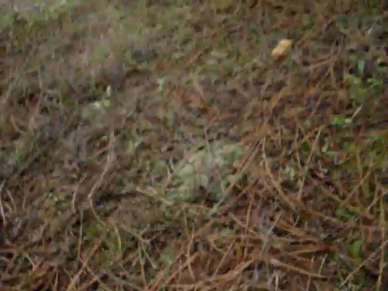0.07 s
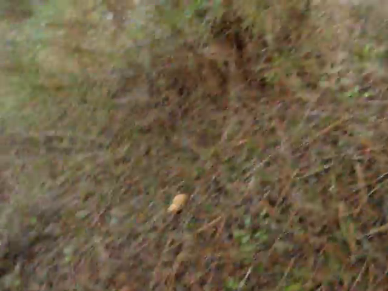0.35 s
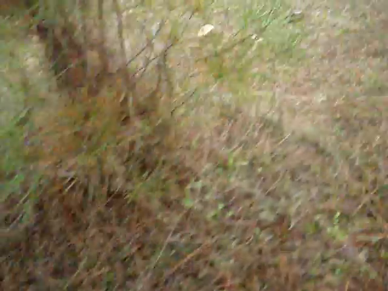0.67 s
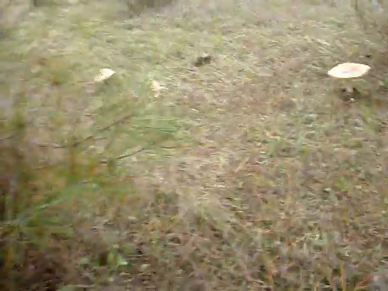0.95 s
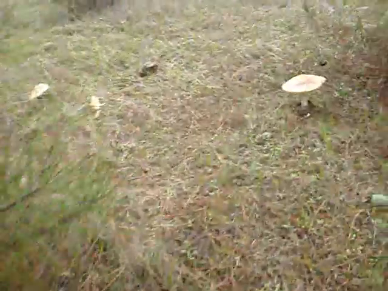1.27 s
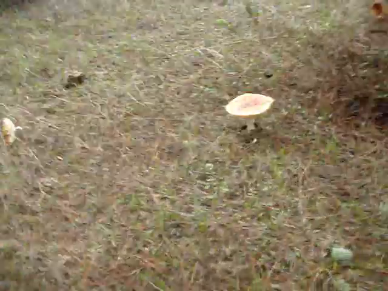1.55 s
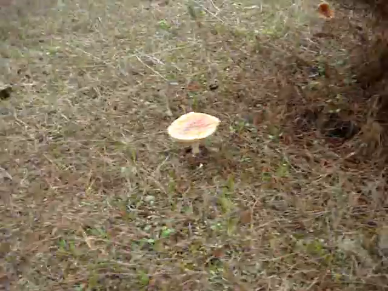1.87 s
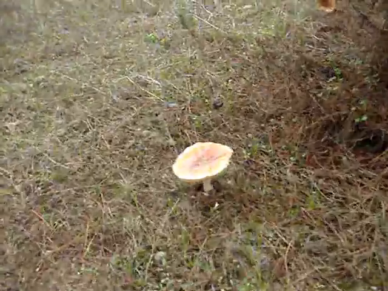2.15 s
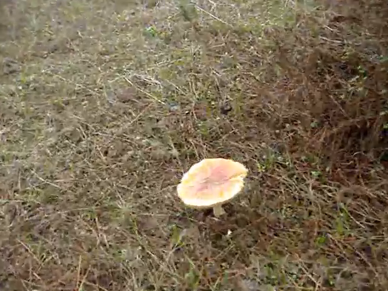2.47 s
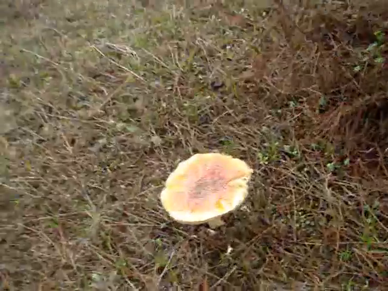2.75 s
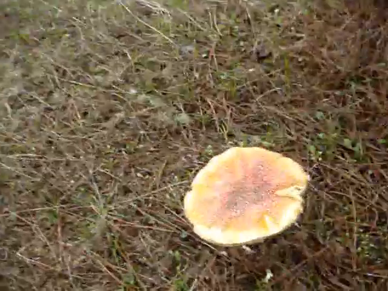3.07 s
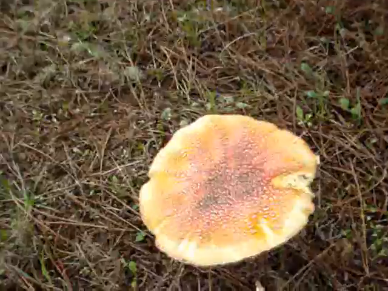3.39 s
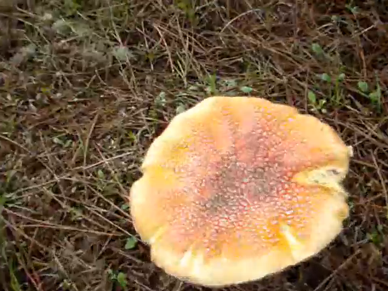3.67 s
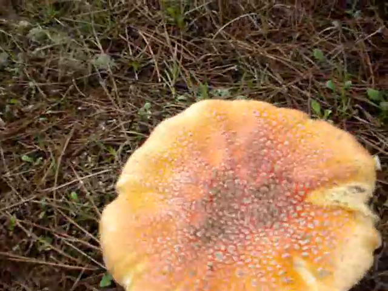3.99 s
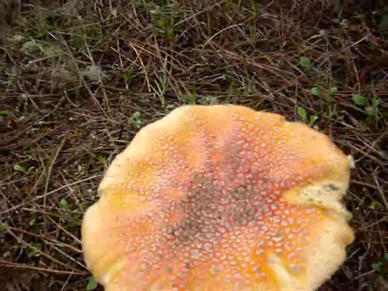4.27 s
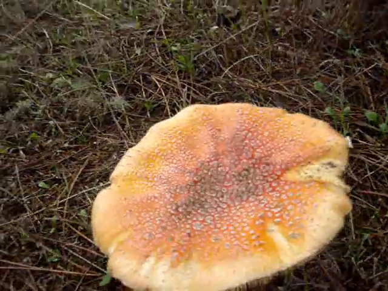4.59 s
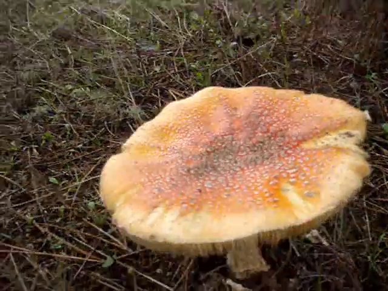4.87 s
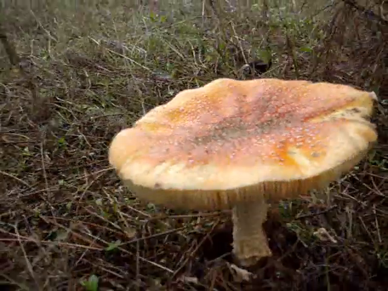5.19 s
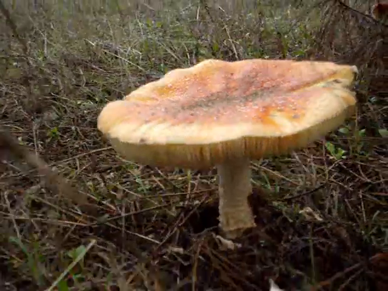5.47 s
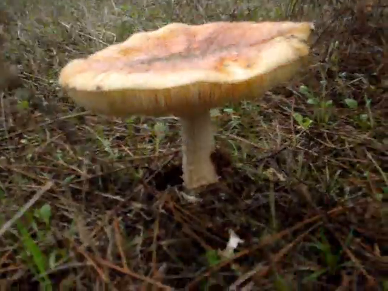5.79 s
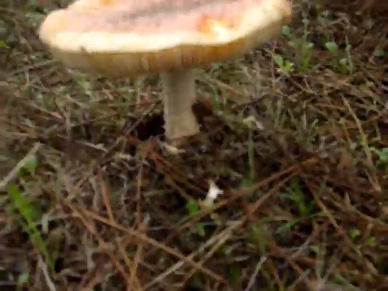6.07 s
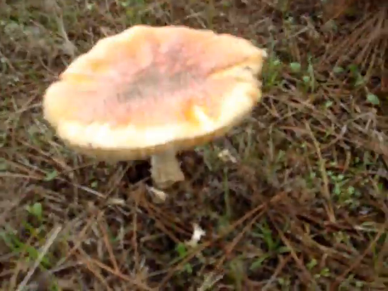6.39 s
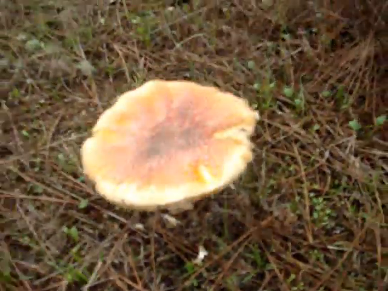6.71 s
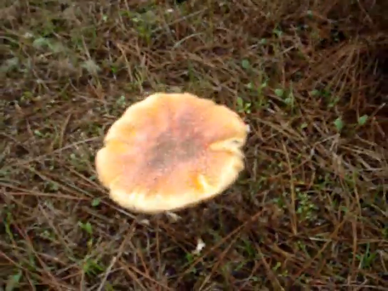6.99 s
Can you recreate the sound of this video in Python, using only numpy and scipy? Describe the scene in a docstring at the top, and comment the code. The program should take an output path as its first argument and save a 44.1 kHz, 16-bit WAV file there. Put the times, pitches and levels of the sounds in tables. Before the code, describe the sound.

Close footsteps crackle over dry forest litter, with sharp twig snaps thinning out to faint cracks against a quiet outdoor hush.

```python
"""Soft hush of an open wood and a faint rustle; then a stick snaps under a heavy footfall.
Someone takes a few steps over dry pine needles and twigs, then crouches, holding a small camera.
Twigs break with a woody knock and a splintering crack; the litter crunches in countless tiny breaks.
Shifting weight breaks a few more twigs, faintly. Short rasping creaks come mostly from the handled
camera's body; its hiss and thin whine run throughout."""
import sys
import numpy as np
from scipy import signal
from scipy.fft import rfft, irfft
from scipy.io import wavfile

SR = 44100
rng = np.random.default_rng(int(sys.argv[2]) if len(sys.argv) > 2 else 0)


def transcribe(u):
    """Save the signal u as a 16-bit wav file named by the first command-line argument.

    u: samples, shape (n,) or (channels, n), limited to [-1, 1]; the rate is SR.
    q: integer samples, one column per channel.
    """
    v = np.clip(np.atleast_2d(u).T, -1, 1)
    q = np.round(v * 32767).astype(np.int16)
    wavfile.write(sys.argv[1], SR, q)


N = 319284
TIME_S = np.arange(N) / SR

# spectra of still air and camera hiss: f/Hz, relative density/dB
HUSH_SPECTRUM = [(15, -57), (25, -22), (85, -10), (124, -5.5), (270, -2), (647, -5), (2150, -12.5),
                 (7000, -21), (9100, -34), (15400, -120)]
HISS_SPECTRUM = [(3000, -27), (5500, -17), (7200, 5), (8400, -0.5), (9700, 0.5), (10500, -10.5),
                 (12500, -10), (15500, -9.5)]
# camera whine, two beating tones: f/Hz, level/dB
WHINE_TONES = [(7553, -79), (7583, -69)]
# handling creaks: t/s, length/s, f/Hz, level at f/dB, overtone level/dB
CREAKS = [(2.261, 0.023, 1500, -48, -35), (2.517, 0.068, 1724, -45, -69), (4.847, 0.025, 1450, -58, -54.5),
          (5.336, 0.064, 1556, -52, -58.5), (5.788, 0.015, 1600, -47, -50),
          (5.876, 0.025, 1530, -53.5, -53.5), (6.689, 0.013, 1440, -55, -49)]
# footfalls and weight shifts: t/s, hold/s, mat crunch/dB, needle fizz/dB
PRESSES = [(0.27, .4, -55, -65), (0.8, .2, -56, -78), (1.032, 0.0096, -39.5, -34),
           (1.112, 0.037, -45, -42.5), (1.19, 0.27, -51.5, -57), (1.582, 0.013, -42.5, -52.5),
           (1.66, 0.13, -54.5, -59), (1.945, 0.09, -52.5, -52), (2.15, 0.067, -52, -45.5),
           (2.28, 0.082, -46, -49), (2.41, 0.0093, -46.5, -50), (2.478, 0.064, -50.5, -46.5),
           (2.62, .32, -50.5, -54.5), (2.98, 0.093, -52, -58), (3.24, 0.094, -53.5, -54),
           (3.475, 0.039, -51, -53), (3.64, 0.099, -56.5, -54), (4.288, .002, -52, -59),
           (4.365, 0.012, -58, -51.5), (4.92, 0.14, -55, -58.5), (5.37, 0.014, -47.5, -55),
           (5.47, 0.097, -55.5, -56), (7.17, 0.023, -56, -55)]
# spectra of the litter's mat and needles: f/Hz, relative density/dB
MAT_SPECTRUM = [(120, -38), (350, -1), (700, 1), (1100, 1.5), (1900, -1.5), (2800, -10.5), (4200, -10),
                (8000, -25.5)]
NEEDLE_SPECTRUM = [(250, -35), (1500, 4.5), (3200, 5), (4500, -0.5), (5700, 1.5), (8200, -3.5), (9700, -15),
                   (11000, -23), (13000, -21), (15500, -9)]
# hollow modes of the thick stick: f/Hz, level/dB, t60/s
STICK_MODES = [(627, -17.5, .045), (804, -14.5, 0.036), (1143, -14.5, 0.023), (1373, -17.5, 0.037),
               (1616, -12, 0.014), (2180, -19, 0.028), (5400, -31, 0.06)]
# twig modes: f/pitch, relative level/dB, decay/snap decay
TWIG_MODES = [(.72, -10, 1), (0.998, -3, 1), (1.38, 2.5, 0.37), (2.05, -19, 0.37)]
# noise of a twig's knock: f/pitch, relative density/dB
KNOCK_SPECTRUM = [(.08, -41), (.33, -13), (.75, -2.5), (2.1, -6.5), (3, -21), (12, -35)]
# tearing fibres: f/Hz, relative density/dB
SPLINTER_SPECTRUM = [(60, -32), (700, 4), (1900, 4.5), (3500, 3.5), (4500, -4.5), (5700, 0.5), (7500, -2),
                     (9700, -6), (11500, -15.5), (15500, -5)]
# breaking twigs: t/s, knock level/dB, pitch/Hz, crack level/dB, crack f/Hz
TWIG_SNAPS = [(0.9964, -24, 1200, -24, 4700), (1.029, -33, 1400, -35, 5000), (1.102, -57, 1200, -36, 6500),
              (1.1074, -24.5, 1140, -32.5, 6000), (1.136, -50, 1150, -37, 5600),
              (1.152, -36.5, 730, -41, 2800), (1.2326, -32.5, 1130, -44, 2580),
              (1.2432, -57, 1150, -41, 3830), (1.3137, -40, 850, -64, 3000), (1.36, -36.5, 560, -54, 2990),
              (1.369, -43, 524, -45, 3480), (1.404, -52, 1090, -44.5, 4800), (1.43, -40.5, 1010, -72, 3000),
              (1.7108, -33.5, 1770, -40, 3300), (1.7209, -35.5, 680, -62, 2500),
              (1.8383, -38, 560, -46.5, 2500), (1.981, -44, 1290, -44, 2900),
              (2.132, -34.5, 750, -28.5, 3830), (2.145, -38.5, 770, -31.5, 3220),
              (2.192, -63, 1170, -38, 3600), (2.22, -56, 1310, -40, 4540), (2.262, -35.5, 826, -27.5, 2840),
              (2.2737, -39.5, 1190, -32, 3420), (2.4618, -42, 560, -32.5, 2210),
              (2.466, -37.5, 530, -36, 2900), (2.494, -54, 1170, -41, 4280), (2.593, -50, 1170, -45, 3500),
              (3.071, -42, 470, -68, 3020), (3.1998, -40, 920, -48, 4030), (3.313, -44, 1160, -44.5, 2770),
              (3.4751, -44.5, 890, -51, 4000), (3.5798, -44.5, 680, -43.5, 4930),
              (3.612, -33.5, 1110, -28.5, 5000), (3.626, -40, 730, -41, 2570),
              (3.8595, -47, 1000, -46.5, 2950), (4.313, -43, 344, -75, 3000), (5.005, -47, 1320, -47, 2620),
              (5.0726, -38, 1250, -47, 5500), (5.102, -39, 790, -42, 1990),
              (5.3157, -43.5, 1140, -50, 3000), (6.1098, -43.5, 626, -43, 1920),
              (6.556, -38.5, 1530, -46, 1900), (6.5868, -45, 1660, -59, 2500),
              (6.693, -46, 1300, -51, 3300), (6.8184, -40, 865, -49, 2880), (6.83, -44, 890, -44.5, 3360),
              (7.1901, -36.5, 615, -62, 3030)]

FIRST_STEP_S = TWIG_SNAPS[0][0]
LEAD_S = .009  # fibres start tearing ahead of the break


def amp(db):
    """dB to gain."""
    return 10 ** (np.asarray(db) / 20)


def unit(x):
    """Scale to rms 1."""
    return x / np.sqrt(np.mean(x ** 2) + 1e-20)


def colour(x, spectrum):
    """Filter by (f/Hz, gain/dB) points on a log-frequency axis."""
    hz, db = np.transpose(spectrum)
    f = np.fft.rfftfreq(len(x), 1 / SR)
    return irfft(rfft(x) * amp(np.interp(np.log(f + 1), np.log(hz), db)), len(x))


def ragged(spectrum, ripple_db):
    """Add chance resonances to a spectrum."""
    hz, db = np.transpose(spectrum)
    f = np.geomspace(60, 16000, 70)
    own_db = ripple_db * rng.uniform(-1.42, 1, len(f))
    return np.column_stack([f, np.interp(np.log(f), np.log(hz), db) + own_db])


def drift(cutoff_hz):
    """Smooth random wander, rms 1."""
    f = np.fft.rfftfreq(N, 1 / SR)
    return unit(irfft(rfft(rng.standard_normal(N)) * np.exp(-(f / cutoff_hz) ** 2), N))


def add(mix, at_s, sound):
    """Mix in place."""
    part = mix[max(round(at_s * SR), 0):][:len(sound)]
    part += sound[:len(part)]


def set_level(x, db, window_s=.008):
    """Scale a snap by its energy up to window_s past the break, averaged over window_s."""
    power = np.sum(x[:round((LEAD_S + window_s) * SR)] ** 2) / (window_s * SR)
    return amp(db) * x / np.sqrt(power + 1e-20)


def wood_hush(level_db=-52, swell_db=.7):
    """Still air in the wood; the level wavers slightly."""
    return unit(colour(rng.standard_normal(N), HUSH_SPECTRUM)) * amp(level_db + swell_db * drift(12.0))


def camera_noise(hiss_db=-65):
    """The camera's hiss and steady, beating whine."""
    hiss = unit(colour(rng.standard_normal(N), HISS_SPECTRUM)) * amp(hiss_db)
    whine = sum(amp(db) * np.sqrt(2) * np.sin(2 * np.pi * hz * TIME_S) for hz, db in WHINE_TONES)
    return hiss + whine


def handling_creaks(overtone_ratio=2.39, q_per_s=170, rough_db=5.0, rasp=0.66):
    """Short rasping creaks ringing near 1.5 and 3.7 kHz, mostly from the handled camera's body."""
    out = np.zeros(N)
    friction = rng.standard_normal(N) * amp(rough_db * drift(400))
    for at_s, length_s, pitch_hz, low_db, high_db in CREAKS:
        drive = friction[round(at_s * SR):round((at_s + length_s) * SR)]
        swell = signal.windows.tukey(len(drive), .5)
        for hz, db in ((pitch_hz, low_db), (pitch_hz * overtone_ratio, high_db)):
            resonator = signal.iirpeak(hz, max(q_per_s * length_s, 2), fs=SR)  # longer: sharper ring
            ring = unit(signal.lfilter(*resonator, signal.lfilter(*resonator, drive)))
            ring /= np.sqrt(.5 + abs(signal.hilbert(ring)) ** 2)  # friction limits the swing
            rasping = colour(drive, [(hz / 10, -20), (hz / 2, -2), (hz, 0), (2 * hz, -20)])
            add(out, at_s, amp(db) * unit(swell * (unit(ring) + rasp * unit(rasping))))
    return out


def trunk_echo(x, wet_db=-19, t60_s=0.09, onset_s=0.0019):
    """Short, faint scatter off ground and trunks."""
    t = np.arange(SR // 2) / SR
    taps = rng.standard_normal(len(t)) * amp(-60 * t / t60_s) * (1 - np.exp(-t / onset_s))
    tail = colour(taps, [(3000, 13.5), (12000, -7.5)])
    return amp(wet_db) * signal.fftconvolve(x, tail / np.linalg.norm(tail))[:N]


def foot_pressure(rest_db=(-62, -62.5), attack_s=0.026, release_s=0.033):
    """Mat and needle levels/dB: presses rise, hold and relax above the stir of a resting foot."""
    power = amp(rest_db)[:, None] ** 2 * np.ones(N)
    for at_s, hold_s, mat_db, needle_db in PRESSES:
        rise = np.clip(1 + (TIME_S - at_s) / attack_s, 0, 1)
        release = np.exp(-np.clip((TIME_S - at_s - hold_s) / release_s, 0, 20))
        power += (amp([[mat_db], [needle_db]]) * rise * release) ** 2
    return 10 * np.log10(power)


def crackle(spectrum, crowding, base_per_s, spread_db, rub, clump_db=3.5, decay_s=0.0012):
    """Tiny uneven breaks over smooth rubbing, in clumps; crowding multiplies the break rate."""
    sizes = amp(spread_db * np.minimum(rng.exponential(1, N), 3)) * rng.choice([-1, 1], N)
    t = np.arange(2 ** 9) / SR
    crinkle = rng.standard_normal(len(t)) * np.exp(-t / decay_s)
    hits = rng.random(N) < crowding * base_per_s / SR
    breaks = unit(signal.oaconvolve(sizes / np.sqrt(crowding) * hits, crinkle)[:N])
    rubbing = rub * rng.standard_normal(N)
    clumps = amp(clump_db * np.tanh(drift(64)))
    return unit(colour((breaks + rubbing) * clumps, spectrum))


def litter(mat_db, needle_db, light_db=-45, heavy_db=-35, tufts=5):
    """Mat crunches, needles fizz, denser under weight; each tuft has its own colour."""
    crowding = np.interp(needle_db, [light_db, heavy_db], [1, 4])
    mat, needles = np.zeros(N), np.zeros(N)
    for _ in range(tufts):
        mat += crackle(ragged(MAT_SPECTRUM, 7.0), crowding, base_per_s=500, spread_db=8.5, rub=0.88)
        needles += crackle(ragged(NEEDLE_SPECTRUM, 2.3), crowding, base_per_s=600, spread_db=10, rub=.15)
    return unit(mat) * amp(mat_db) + unit(needles) * amp(needle_db)


def stalk_ticks(mat_db, needle_db, light_db=-53, heavy_db=-45, spread_db=2.5, candidates=300):
    """Small stalks break at random, more often and louder under weight."""
    out = np.zeros(N)
    for when, chance, pitch, size in rng.random((candidates, 4)):
        at = int(when * N)
        rate_per_s = np.interp(needle_db[at], [light_db, heavy_db], [3, 35])
        if chance * candidates * SR / N < rate_per_s:
            hz = np.interp(pitch, [0, 1], [790, 1950])
            size_db = spread_db * (2 * size - 1)
            knock_db, crack_db = mat_db[at] + 1.5 + size_db, needle_db[at] - 0.5 + size_db
            add(out, at / SR - LEAD_S, snap(knock_db, hz, crack_db, crack_hz=6 * hz))
    return out


def heel_thud(push_db=-29.0, push_s=0.0022, thud_db=-45, decay_s=0.014):
    """First, heaviest footfall: a low push of air and a dull thud in soft ground."""
    out, t = np.zeros(N), np.arange(2 ** 11) / SR
    u = t / push_s - 2
    push = (1 - u ** 2) * np.exp(-u ** 2)
    soil = unit(colour(rng.standard_normal(len(t)), [(300, -7), (900, -36)]))
    add(out, FIRST_STEP_S, amp(push_db) * push + amp(thud_db) * soil * np.exp(-t / decay_s))
    return out


def stick_ring():
    """The thick stick rings hollow at the first snap."""
    out, t = np.zeros(N), np.arange(2 ** 12) / SR
    for k, (hz, db, t60_s) in enumerate(STICK_MODES):
        add(out, FIRST_STEP_S, (-1) ** k * amp(db - 60 * t / t60_s) * np.sin(2 * np.pi * hz * t))
    return out


def snap(knock_db, hz, crack_db, crack_hz, rise_s=0.00063, linger_s=0.008, strain_s=0.00047):
    """One break: fibres tear, then the wood gives in a bright burst and rings a few cycles."""
    t = np.arange(2 ** 12) / SR - LEAD_S
    after_s = np.maximum(t, 0)
    splintery = np.interp(crack_db - knock_db, [-23, 14], [0, 1])  # 0: clean break
    thickness = max(1000 / hz, 1) ** 0.16  # thick, low twigs ring longer
    decay_s = np.interp(splintery, [0, 1], [0.0019, 0.0023]) * thickness
    tear_s = np.interp(splintery, [0, 1], [.0006, .0012])
    phases = rng.uniform(0, 2 * np.pi, len(TWIG_MODES))
    ring = sum(amp(db) * np.exp(-after_s / (decay_s * life)) * np.sin(2 * np.pi * hz * ratio * t + phase)
               for (ratio, db, life), phase in zip(TWIG_MODES, phases))
    fade = np.exp(-after_s / (1.6 * decay_s)) + 0.12 * np.exp(-after_s / linger_s)  # litter shakes on
    body, fibres, sizes = rng.standard_normal((3, len(t)))
    body = colour(body, [(hz * ratio, db) for ratio, db in KNOCK_SPECTRUM]) * fade
    onset = 1 + np.tanh(t / rise_s - 1)
    knock = set_level(ring * onset, 0) + 0.96 * set_level(body * onset, 0)
    tearing = colour(fibres * amp(2.5 * sizes), ragged(SPLINTER_SPECTRUM, 4.5))
    band = [(crack_hz / 4, -11), (crack_hz, 0), (crack_hz * 4, -11)]  # finer fibres crack higher
    build = 1 + np.tanh((t / tear_s - 1) / 2)
    strain = 0.21 * splintery * np.exp(np.minimum(t, 0) / strain_s)  # audible ahead of the break
    crack = colour(tearing, band) * fade * (build + strain)
    return set_level(knock, knock_db) + set_level(crack, crack_db)


def twig_snaps():
    """Twigs break underfoot, each at its listed time."""
    out = np.zeros(N)
    for at_s, *twig in TWIG_SNAPS:
        add(out, at_s - LEAD_S, snap(*twig))
    return out


def scene():
    """Close footsteps and handling creaks over hush and camera noise; mono."""
    background = wood_hush() + camera_noise()
    mat_db, needle_db = foot_pressure()
    close = litter(mat_db, needle_db) + heel_thud() + stick_ring() + handling_creaks()
    close += twig_snaps() + stalk_ticks(mat_db, needle_db)
    return (background + close + trunk_echo(close))[None]


def record(dry):
    """The camera's band limit."""
    lowpass = signal.firwin(511, cutoff=15950, window=("kaiser", 9), fs=SR)
    return signal.oaconvolve(dry, lowpass[None], "same")


dry = scene()
out = record(dry)
transcribe(out)
```